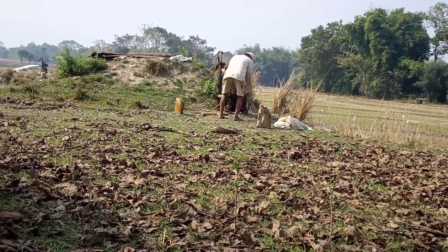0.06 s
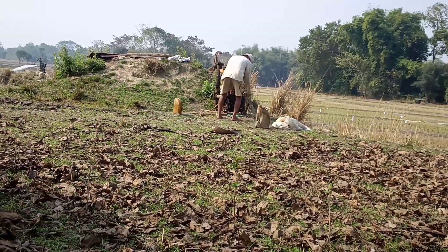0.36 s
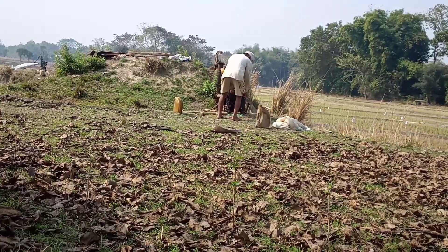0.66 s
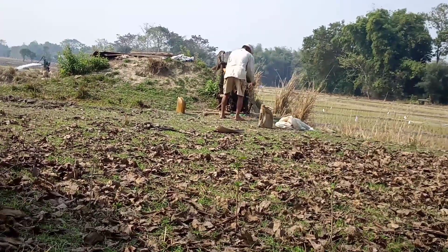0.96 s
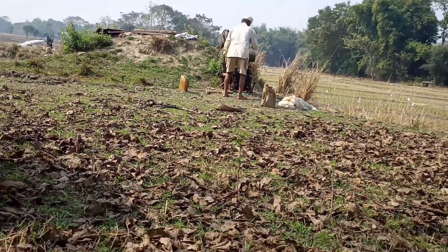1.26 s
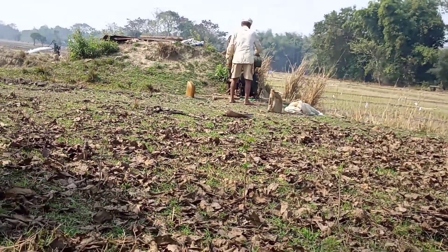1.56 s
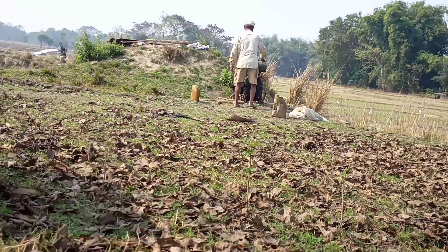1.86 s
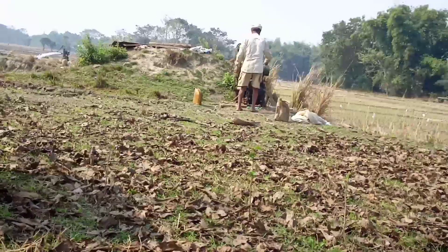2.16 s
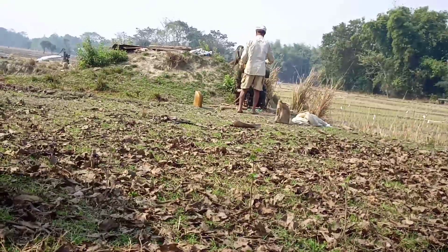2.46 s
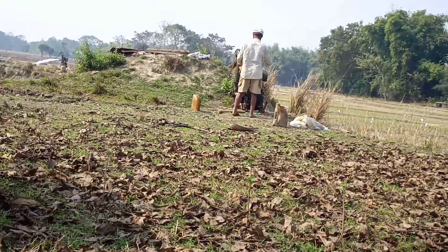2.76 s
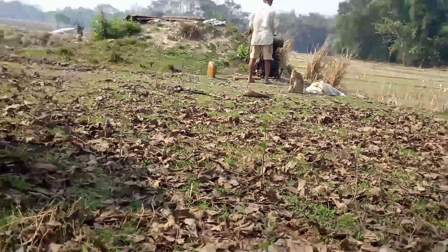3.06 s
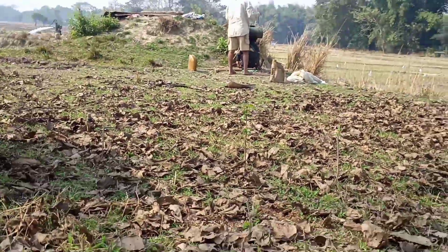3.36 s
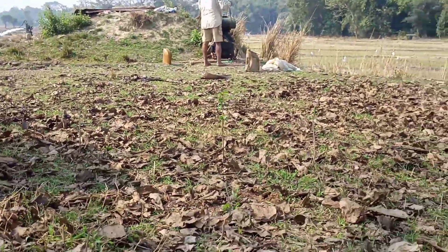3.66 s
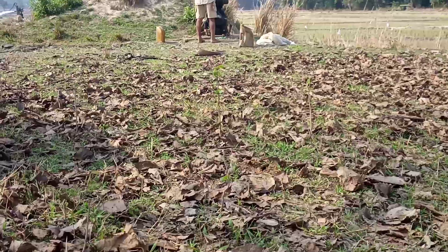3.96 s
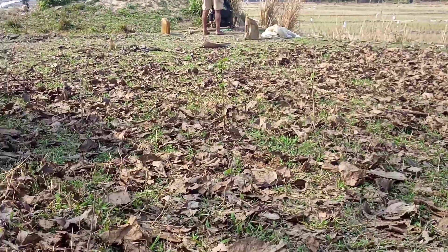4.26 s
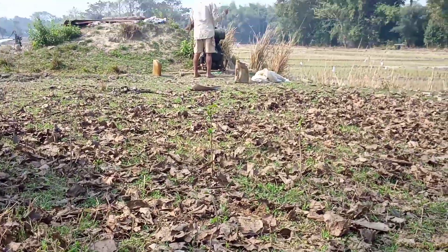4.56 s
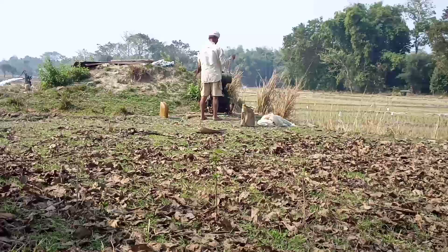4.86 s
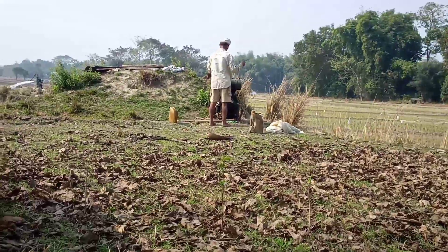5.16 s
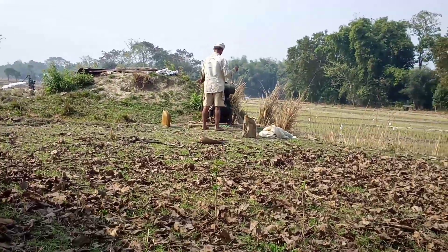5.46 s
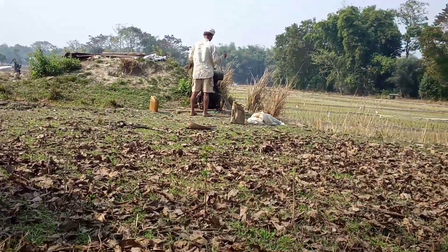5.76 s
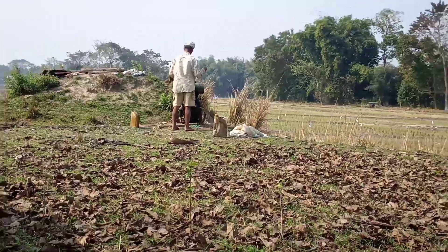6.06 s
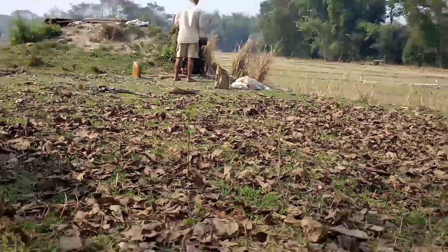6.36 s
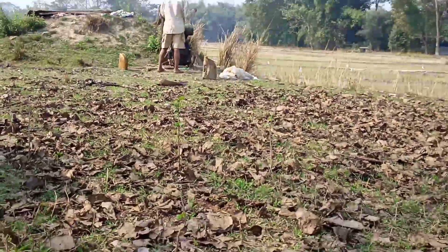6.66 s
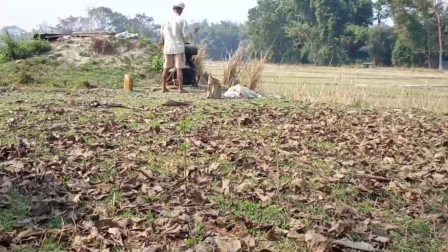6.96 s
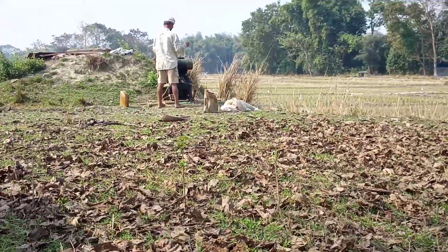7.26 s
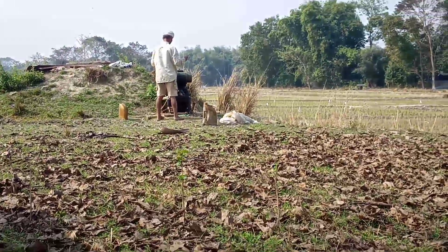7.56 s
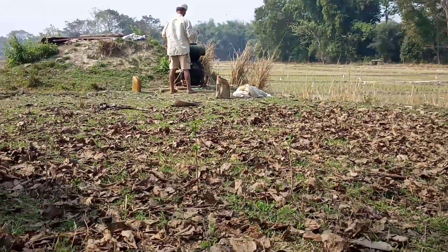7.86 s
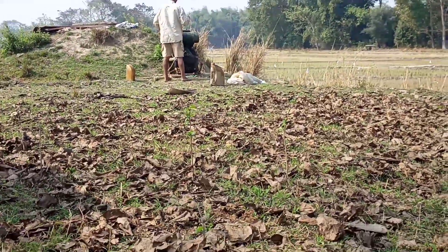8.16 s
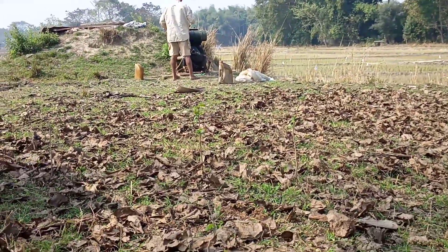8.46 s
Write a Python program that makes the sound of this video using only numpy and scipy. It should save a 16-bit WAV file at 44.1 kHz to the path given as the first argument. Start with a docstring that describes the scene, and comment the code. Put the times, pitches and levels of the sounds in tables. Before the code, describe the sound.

Rapid thudding and clinking of a stationary engine outdoors, others chugging farther off; midway come a fabric hiss, dull thumps and leaf crackles.

```python
"""From the start, a single-cylinder diesel pump runs in an open field: gas pulses thud, combustion knocks,
impacts ring its steel, and a bright tick keeps its own rate. Three more engines chug further off, each
at its own speed, over a low drone and a fine wash. After a few faint rustles, cloth slides past the
microphone from about 4 s, hissing by friction; then a hand bumps the device and dry leaves crackle,
most densely near 6 s. After that a throbbing whine fades in on the second engine and stays."""
import sys
import numpy as np
from scipy import signal
from scipy.fft import rfft, irfft, next_fast_len
from scipy.io import wavfile
from scipy.ndimage import uniform_filter1d

SR = 44100
rng = np.random.default_rng(int(sys.argv[2]) if len(sys.argv) > 2 else 0)


def store_wav(level_fs):
    """Save 16-bit WAV to argv[1]."""
    pcm = np.round(np.clip(np.atleast_2d(level_fs), -1, 1) * 32767)
    wavfile.write(sys.argv[1], SR, pcm.T.astype(np.int16))


N = 374850
TIME = np.arange(N) / SR


# gas pulses in one cycle: delay/s, centre f/Hz, width/octaves, peak level/dB, sign (1 push, -1 suction)
PUMP_PULSES = [(.0032, 124.7, 1.5, -35.5, 1), (.0205, 321, 1.25, -40, -1), (.0425, 198, 1.5, -38, 1),
               (.062, 507, .9, -46, 1)]
def pump():
    """Periodic excitation: every cycle of the near engine repeats its knock, valve impacts and gas thuds."""
    times = firings(first_s=-.0114, rate_hz=13.081, shift_s=6.49, later_hz=13.057)
    return knock(times - .0025) + valve_gear(times) + chug(times, PUMP_PULSES, uneven_db=1.5, jitter_s=.00027)


# spectrum of the combustion crack: f/Hz, spectral level/dB
CRACK_SPECTRUM = [(1000, -3), (1800, -15), (2350, -1), (2850, 0), (3800, 8), (4900, -1), (7000, 6.5),
                  (8800, -8), (13000, -11.5), (16000, -30)]
# steel modes of the block: f/Hz, level/dB
BLOCK_MODES = [(2200, -13.5), (2420, -13.5), (3400, -6), (3690, -11.5), (4150, -15.5), (6300, -13.5),
               (7450, -13.5), (9500, -24), (11500, -24), (13400, -28)]
# steel modes of the cylinder: f/Hz, level/dB
CYLINDER_MODES = [(2150, -50.5), (2410, -49.5), (2600, -50)]
# knock, louder when the engine is not screened: t/s, crack gain/dB, block gain/dB, cylinder gain/dB
KNOCK_GAINS = [(0, -50, -50, 1.5), (2, -47, -56, 0.5), (3.1, -42.5, -51, -2), (3.6, -42.5, -43, -6),
               (4.3, -39.5, -34.5, -7), (5.35, -38, -30, -3), (5.5, -38, -29.5, -3),
               (5.8, -36.5, -30.5, -6), (5.88, -39, -34, -1), (6.5, -42.5, -39, 0), (7.05, -43, -41, -3),
               (7.33, -42, -35, 9), (7.47, -41, -30.5, 4), (7.78, -36.5, -35.5, 5), (8.1, -37, -36.5, 4),
               (8.3, -37.5, -30.5, -5), (8.5, -42, -34, 2)]
def knock(times):
    """Impulse excitation: combustion gives a broadband crack and rings the block and the cylinder."""
    spike = bursts(times, rise_s=.0014, decay_s=.0023, uneven_db=1.1)
    tail = bursts(times + .0025, rise_s=.0027, decay_s=.034, uneven_db=.89)
    crack = .81 * noise(CRACK_SPECTRUM) * (spike + .17 * tail)
    block = clang(times, BLOCK_MODES, rise_s=.0009, decay_s=.0022, uneven_db=1.5, spread_hz=71)
    cylinder = clang(times, CYLINDER_MODES, rise_s=.001, decay_s=.0038, uneven_db=1, spread_hz=23)
    return gain(KNOCK_GAINS, 1) * crack + gain(KNOCK_GAINS, 2) * block + gain(KNOCK_GAINS, 3) * cylinder


# steel modes of the valve gear: f/Hz, level/dB
VALVE_MODES = [(2130, -49.5), (2380, -58), (2610, -46.5), (3050, -55.5)]
# impacts in one cycle: delay/s, gain/dB
VALVE_IMPACTS = [(-.0215, -5), (-.0175, 0), (.019, -8)]
def valve_gear(times):
    """Free vibration after impact: the valve gear clinks three times a cycle over a faint steady rattle."""
    out = from_db(-66.5) * narrow_noise(2560, width_hz=51)
    for delay, db in VALVE_IMPACTS:
        clink = clang(times + delay, VALVE_MODES, rise_s=.0013, decay_s=.0033, uneven_db=1.5, spread_hz=28)
        out += from_db(db) * clink
    return out


# strength of the tick: t/s, level/dB
TICK_LEVEL = [(0, -51), (.7, -43.5), (1.6, -49), (2.25, -44.5), (2.9, -40), (3.7, -46), (6, -44.5),
              (7.1, -46.5), (7.6, -48), (8.5, -47)]
def belt(first_s=.0851, rate_hz=11.261):
    """Periodic impact: a bright tick, probably the joint of a drive belt meeting a pulley."""
    ticks = bursts(np.arange(first_s, N / SR, 1 / rate_hz), rise_s=.0013, decay_s=.0019, uneven_db=1.05)
    return gain(TICK_LEVEL) * ticks * band_noise(7120, octaves=.37)


# gas pulses in one cycle: delay/s, centre f/Hz, width/octaves, peak level/dB, sign (1 push, -1 suction)
SECOND_PULSES = [(-.0171, 230, 0.84, -38.5, 1), (0.014, 350, 1.1, -41.5, 1), (0.021, 122, 0.55, -35.5, 1),
                 (0.039, 240, 1.3, -41, -1), (0.048, 265, 1.1, -47.5, 1)]
# hunting around the set speed: t/s, lateness of the firings/s
HUNTING = [(0, -0.00074), (.9, -0.0026), (2.1, 0.0012), (3, -0.0013), (4.35, 0.00059), (5.8, -.0007),
           (7.1, -0.00076), (8.5, 0.0013)]
# the sound carries better midway: t/s, bark gain/dB, boom level/dB
CARRY = [(0, 0, -54), (2.4, -0.5, -53), (3.6, .5, -41.5), (5.2, 0, -43), (6.6, -2.5, -49), (8.5, -.5, -52)]
def second_engine():
    """Source and resonator: a slower, distant engine puffs, barks and booms through a ringing pipe."""
    times = firings(first_s=.0178, rate_hz=12.516, shift_s=5.77, later_hz=12.54)
    times += np.interp(times, *np.transpose(HUNTING))
    thuds = chug(times, SECOND_PULSES, uneven_db=1, jitter_s=.00005)
    barks = gain(CARRY, 1) * bark(times)
    boom = clang(times + .035, [(315, 0)], rise_s=.0055, decay_s=.0074, uneven_db=1, spread_hz=7.7)
    return thuds + barks + gain(CARRY, 2) * boom + pipe_ring(times) + exhaust_hiss(times) + whine(times)


# barks in one cycle: delay/s, duration/s, start f/Hz, end f/Hz, peak level/dB
BARK_SWEEPS = [(-.0042, 0.01455, 431, 960, -44), (.0095, .009, 420, 700, -50.5),
               (.0347, .0125, 350, 600, -46)]
def bark(times, uneven_db=1.3, uneven_pitch=.037):
    """Dispersion: each far exhaust crack is smeared on its way into a short upward sweep."""
    out = np.zeros(N)
    for delay, length_s, start_hz, end_hz, db in BARK_SWEEPS:
        progress = np.linspace(0, 1, int(length_s * SR))
        shape = progress * (1 - progress) ** 2
        for s, (strength, bend) in zip(times, rng.standard_normal((len(times), 2))):
            hz = start_hz + (end_hz * (1 + uneven_pitch * bend) - start_hz) * progress
            sweep = np.sin(2 * np.pi * np.cumsum(hz) / SR)
            add(out, s + delay, from_db(db + uneven_db * strength) * sweep * shape / shape.max())
    return out


# resonances of the exhaust pipe: delay/s, f/Hz, decay time/s, level/dB
PIPE_MODES = [(.04, 266, 0.03, -47.5), (.04, 388, 0.042, -59), (0.034, 498, 0.025, -59),
              (.04, 526, 0.034, -52.5), (.04, 530, 0.044, -64), (.003, 776, 0.022, -60),
              (.0046, 870, 0.036, -68), (0.0038, 1100, .038, -70), (0, 990, 0.043, -62),
              (-0.0021, 1115, 0.014, -56.5), (.00067, 1289, 0.051, -65)]
def pipe_ring(times):
    """Pipe resonance: every exhaust stroke excites the same damped sinusoids."""
    age, out = TIME[:SR // 5], np.zeros(N)
    for delay, hz, decay_s, db in PIPE_MODES:
        ring = from_db(db) * np.sin(2 * np.pi * hz * age) * np.exp(-age / decay_s)
        for s in times:
            add(out, s + delay, ring)
    return out


# spectrum of the exhaust hiss: f/Hz, spectral level/dB
HISS_SPECTRUM = [(700, -5.5), (1500, -2.5), (2600, 3), (3700, -2), (4900, -10), (7000, 1), (10000, -15.5),
                 (13500, -17), (15600, -26)]
# strength of the hiss: t/s, level/dB
EXHAUST_LEVEL = [(0, -47.5), (.6, -48.5), (2.1, -47.5), (3.3, -49), (7, -47.5), (8.5, -48)]
def exhaust_hiss(times):
    """Flow noise: each exhaust stroke releases a burst of hiss."""
    strokes = bursts(times + .02, rise_s=.0029, decay_s=.019, uneven_db=1.2)
    return gain(EXHAUST_LEVEL) * noise(HISS_SPECTRUM) * strokes


def whine(times, hz=1096, db=-55, start_s=6.24, fade_s=.61):
    """Amplitude modulation: a tone that throbs with the firings fades in late and stays."""
    throb = clang(times + .015, [(hz, 0)], rise_s=.0076, decay_s=.014, uneven_db=.8, spread_hz=8.5)
    fade = np.clip((TIME - start_s) / fade_s, 0, 1)
    return from_db(db) * fade * (throb + .17 * narrow_noise(hz, width_hz=35))


# spectrum of rubbing fabric: f/Hz, spectral level/dB
CLOTH_SPECTRUM = [(470, -4.5), (850, -7.5), (1750, -3), (2500, 0), (3300, 4), (5200, -8.5), (7100, 4.5),
                  (10000, -14), (13300, -12), (15600, -21)]
# strokes: middle t/s, peak gain/dB, half duration/s, treble gain/dB, further gain at the very top/dB
STROKES = [(0.256, -53, .07, 3, 6), (1.109, -54.5, 0.066, 6, 0), (1.632, -57, .13, 8, 3),
           (3.447, -57, 0.49, 3.5, 5), (4.422, -39.5, 0.13, -4.5, 9), (4.277, -47, 0.093, -7, 1),
           (4.647, -40.5, 0.1, -7.5, 15), (4.844, -35, 0.15, -1, 3), (5.042, -35, 0.069, 6, -6),
           (5.13, -38, 0.026, 3, -3), (5.27, -41, 0.17, 2, -2), (5.665, -40.5, 0.023, 2, -1),
           (6.11, -46, 0.55, 2, 1)]
# scrape of the weave in the long slide: t/s, f/Hz, level/dB
WEAVE_SCRAPE = [(4.55, 2450, -75), (4.68, 2560, -47.5), (4.79, 2800, -45), (4.89, 2824, -49),
                (4.97, 2957, -44.5), (5.08, 3040, -50), (5.135, 3100, -44), (5.19, 3150, -54),
                (5.3, 3290, -47), (5.45, 3465, -73)]
def cloth(grain_db=2.5):
    """Sliding friction: fabric hisses unevenly, and its weave scrapes higher as it slides faster."""
    grain = from_db(grain_db * flicker(samples=200))
    low, treble = split(noise(CLOTH_SPECTRUM), 5100)
    high, top = split(treble, 13300)
    rub = sum(swell(s, db, half_s) * (low + from_db(treble_db) * (high + from_db(top_db) * top))
              for s, db, half_s, treble_db, top_db in STROKES)
    scrape = gain(WEAVE_SCRAPE, 2) * narrow_noise(curve(WEAVE_SCRAPE, 1), width_hz=380)
    return grain * (.6 * rub + scrape)


# shifts of the grip: middle t/s, peak level/dB, half duration/s
GRIP_SWELLS = [(1.6, -39.5, 0.052), (2.28, -41, .12), (5.44, -38, 0.28), (6.12, -32, 0.093),
               (7.32, -39, 0.077), (7.68, -38.5, .086)]
# bumps of the hand: t/s, centre f/Hz, peak level/dB
HAND_BUMPS = [(2.3413, 123, -25), (5.284, 170, -28.5), (5.43, 160, -21.5), (5.462, 115, -23.5),
              (5.5697, 194, -24), (5.58, 120, -21), (5.635, 129, -27.5), (5.899, 138, -23),
              (6.138, 245, -18), (6.1425, 194, -17), (6.186, 209, -22.5), (6.201, 111, -23),
              (7.2987, 114, -22)]
def hand():
    """Structure-borne sound: rumble and dull bumps reach the microphone through its case."""
    grip_power = sum(swell(*row) ** 2 for row in GRIP_SWELLS)
    out = np.sqrt(grip_power) * band_noise(79, octaves=2.1)
    for s, hz, db in HAND_BUMPS:
        pulse, lead_s = thud(hz, octaves=1.14)
        add(out, s - lead_s, -from_db(db) * pulse)
    return out


# distinct snaps of dry leaves, and a few lone knocks of the pump (near 0.66, 3.65, 4.73, 6.18, 7.28 and 8.14
# s): t/s, level/dB, decay time/s, f/Hz, relative level of the broadband splinter/dB
SNAPS = [(.655, -39, .006, 2700, -9), (.657, -43, .006, 4900, -3), (1.058, -43, 0.0029, 7000, -10),
         (3.6105, -44, 0.0024, 3400, -12), (3.6542, -44, .004, 3620, 1),
         (4.039, -51, 0.0059, 12600, -16), (4.397, -44, .003, 13000, -3),
         (4.7267, -31.5, 0.004, 3500, -17), (5.07, -36, .002, 13700, -6),
         (5.374, -31.5, 0.0025, 6030, -10), (5.609, -41, .0027, 6900, -6),
         (5.637, -37, .003, 6900, -8), (5.679, -31.5, 0.0053, 6500, -13),
         (5.818, -37, 0.0033, 7160, -13), (5.966, -32.5, 0.0041, 7040, -6),
         (6.068, -47, .0015, 13000, -3), (6.086, -35, .0048, 7060, -14),
         (6.134, -35, 0.0017, 7260, -11), (6.177, -41, .0058, 3200, -4),
         (6.174, -35.5, 0.0075, 6960, -8), (6.205, -34, 0.0018, 7250, -11),
         (6.229, -38, .002, 7600, -7), (6.262, -34, 0.0033, 7200, -4),
         (6.2838, -31, 0.0016, 7650, -10), (6.329, -30, 0.0077, 7400, -11),
         (6.382, -39, 0.0013, 7870, -9), (6.444, -43, .003, 7500, -8),
         (6.568, -32.5, 0.0026, 7160, -17), (6.8603, -29.5, 0.0027, 7140, -21),
         (6.868, -43, .003, 3300, -16), (7.279, -37.5, 0.0033, 2280, -12),
         (8.142, -39, 0.0053, 4300, -16)]
def crackles(fine_count=22, fine_s=6.1, spread_s=.27):
    """Damped transients: dry leaves snap and a few lone knocks of the pump ring out, each a ringing peak over
    broad noise, with a fine scatter."""
    age, out = TIME[:SR // 10], np.zeros(N)
    fine_snaps = [(s, -47, .00099, 12130, 0) for s in rng.normal(fine_s, spread_s, fine_count)]
    for s, db, decay_s, hz, splinter_db in SNAPS + fine_snaps:
        ring = band_noise(hz, octaves=.44, samples=len(age))
        splinter = from_db(splinter_db) * band_noise(7600, octaves=3.8, samples=len(age))
        add(out, s, from_db(db) * (ring + splinter) * np.exp(-age / decay_s))
    return out


# gas pulses of each engine: delay/s, centre f/Hz, width/octaves, peak level/dB, sign (1 push)
THIRD_PULSES = [(0, 110, 1.15, -36.5, 1), (.01, 168, 0.93, -45.5, 1)]
FOURTH_PULSES = [(0, 118, 0.95, -39, 1), (-0.012, 260, 0.94, -54.5, 1)]
def far_engines():
    """Attenuation with distance: of the third and fourth engines only the bass pulses carry."""
    third = firings(first_s=.009, rate_hz=17.987, shift_s=2.62, later_hz=18.021)
    fourth = firings(first_s=-.0278, rate_hz=12.004, shift_s=2.64, later_hz=12.02)
    return (chug(third, THIRD_PULSES, uneven_db=1, jitter_s=.00042)
            + chug(fourth, FOURTH_PULSES, uneven_db=2.5, jitter_s=.00031))


# low and high parts of the blur of machinery, water and field: f/Hz, spectral level/dB
DRONE_SPECTRUM = [(25, -44), (37, -36), (61, -3.5), (92, 1.5), (150, -5.2), (230, -3.5), (330, -18),
                  (520, -16), (700, -27.5), (900, -28), (1300, -62)]
WASH_SPECTRUM = [(470, -42), (800, -4), (851, -7.5), (1110, -2), (1190, -4.5), (1470, -3), (2420, 1),
                 (2610, 1.5), (2850, -2), (3700, -2), (4920, -12), (7060, -5), (10000, -22.5), (13600, -22),
                 (15600, -30)]
def field(drone_db=-42, wash_db=-51, flutter_db=1.5, tick_db=-55, ticks_per_s=14):
    """Ambient noise: a low drone, a wash whose treble flutters, and stray ticks among the dry leaves."""
    tick_times = rng.uniform(0, N / SR, int(ticks_per_s * N / SR))
    ticks = bursts(tick_times, rise_s=.00019, decay_s=.002, uneven_db=3.4)
    leaves = from_db(tick_db) * ticks * band_noise(7600, octaves=.59)
    low, high = split(noise(WASH_SPECTRUM), 4900)
    wash = low + high * from_db(flutter_db * flicker(samples=2400) - .86)
    return from_db(drone_db) * noise(DRONE_SPECTRUM) + from_db(wash_db) * wash + leaves


def firings(first_s, rate_hz, shift_s, later_hz):
    """Periodic motion: firing times, steady but for one small shift of the governor."""
    steady = first_s + np.arange(int(rate_hz * N / SR) + 2) / rate_hz
    return np.where(steady < shift_s, steady, shift_s + (steady - shift_s) * rate_hz / later_hz)


def chug(times, pulses, uneven_db, jitter_s):
    """Pulse train: exhaust pushes and intake suctions repeat every working cycle."""
    out = np.zeros(N)
    for delay, hz, octaves, db, sign in pulses:
        pulse, lead_s = thud(hz, octaves)
        for s, (strength, slip) in zip(times, rng.standard_normal((len(times), 2))):
            add(out, s + delay - lead_s + jitter_s * slip, sign * from_db(db + uneven_db * strength) * pulse)
    return out


def thud(hz, octaves):
    """Impulse response: a damped, rounded pressure pulse of height 1, and its time to peak."""
    rounding = signal.butter(2, np.clip(1.75 * hz, 20, SR / 4), fs=SR, output="sos")
    pulse = -signal.sosfilt(rounding, band(signal.unit_impulse(SR // 10), hz, octaves))
    return pulse / pulse.max(), np.argmax(pulse) / SR


def clang(times, modes, rise_s, decay_s, uneven_db, spread_hz):
    """Modal superposition: each blow rings the modes with slightly new levels and tuning."""
    age, out = TIME[:SR // 25], np.zeros(N)
    shape = envelope(age, rise_s, decay_s)
    hz, db = np.transpose(modes)
    for s, (strength, detune, phase) in zip(times, rng.standard_normal((len(times), 3, len(hz)))):
        partials = np.sin(2 * np.pi * (np.outer(hz + spread_hz * detune, age) + phase[:, None]))
        add(out, s, from_db(db + uneven_db * strength) @ partials * shape)
    return out


def bursts(times, rise_s, decay_s, uneven_db):
    """Superposition: the summed envelopes of blows of unequal strength."""
    shape, out = envelope(TIME[:SR // 10], rise_s, decay_s), np.zeros(N)
    for s, db in zip(times, rng.normal(0, uneven_db, len(times))):
        add(out, s, from_db(db) * shape)
    return out


def envelope(age, rise_s, decay_s):
    """Exponential damping after a smooth onset, peak 1."""
    shape = (1 - np.exp(-age / rise_s)) ** 2 * np.exp(-age / decay_s)
    return shape / shape.max()


def swell(s, db, half_s):
    """Gaussian envelope of a movement that grows and fades."""
    return from_db(db) * np.exp(-((TIME - s) / half_s) ** 2)


def noise(spectrum):
    """Spectral shaping of white noise, rms 1."""
    size = next_fast_len(N)
    bins_hz = np.maximum(np.fft.rfftfreq(size, 1 / SR), 1)
    hz, db = np.transpose(spectrum)
    colour = from_db(np.interp(np.log(bins_hz), np.log(hz), db))
    return rms_one(irfft(rfft(rng.standard_normal(size)) * colour, size)[:N])


def narrow_noise(hz, width_hz):
    """Random forcing of a resonance whose centre may move, rms 1."""
    pole = np.exp(-np.pi * width_hz / SR)
    slow = signal.lfilter([1], [1, -2 * pole, pole * pole], rng.standard_normal((2, N)))
    phase = 2 * np.pi * np.cumsum(hz + np.zeros(N)) / SR
    return rms_one(slow[0] * np.cos(phase) + slow[1] * np.sin(phase))


def band_noise(hz, octaves, samples=N):
    """Band-limited noise, rms 1."""
    return rms_one(band(rng.standard_normal(samples), hz, octaves))


def flicker(samples):
    """Moving average of noise: a slow fluctuation, rms 1."""
    return rms_one(uniform_filter1d(rng.standard_normal(N), size=samples))


def band(x, hz, octaves):
    """Band-pass filtering around a centre."""
    edges = np.clip([hz / 2 ** (octaves / 2), hz * 2 ** (octaves / 2)], 10, SR / 2 - 100)
    return signal.sosfilt(signal.butter(2, edges, "band", fs=SR, output="sos"), x)


def split(x, hz):
    """Complementary filtering: the parts below and above a frequency."""
    low = signal.sosfiltfilt(signal.butter(2, hz, fs=SR, output="sos"), x)
    return low, x - low


def add(out, s, sound):
    """Superposition of a short sound at time s."""
    at = int(round(s * SR))
    first, last = max(at, 0), min(at + len(sound), N)
    if last > first:
        out[first:last] += sound[first - at:last - at]


def curve(rows, column):
    """Linear interpolation of a column at every sample."""
    rows = np.array(rows)
    return np.interp(TIME, rows[:, 0], rows[:, column])


def gain(rows, column=1):
    """Amplitude ratio over time from a column in dB."""
    return from_db(curve(rows, column))


def from_db(db):
    """Level to amplitude ratio."""
    return 10 ** (np.asarray(db) / 20)


def rms_one(x):
    """Normalisation to unit power."""
    return x / np.sqrt(np.mean(x ** 2) + 1e-20)


def scene():
    """Free field: the sources add without reverberation."""
    return (pump() + belt() + second_engine() + cloth() + hand() + crackles() + far_engines() + field())[None]


def record(dry, bass_hz=36, cutoff_hz=15600):
    """Band limiting: the microphone drops the deepest bass, and the top is cut."""
    _, thin = split(dry, bass_hz)
    return signal.sosfilt(signal.ellip(10, .1, 80, cutoff_hz, fs=SR, output="sos"), thin)


dry = scene()
out = record(dry)
store_wav(out)
```